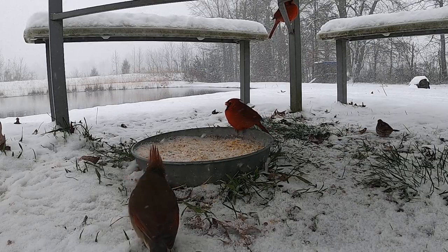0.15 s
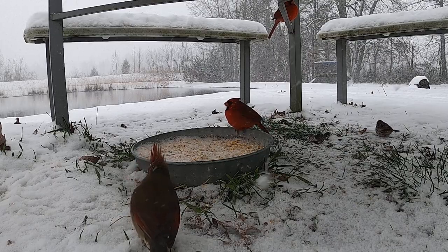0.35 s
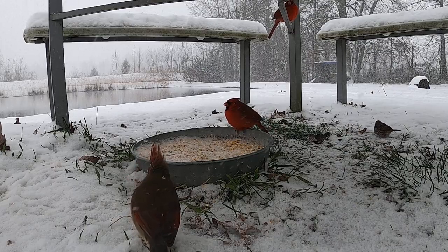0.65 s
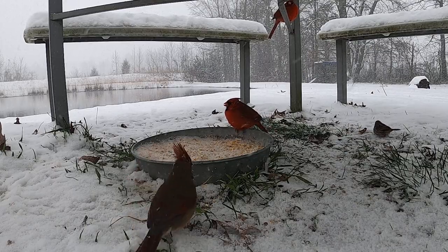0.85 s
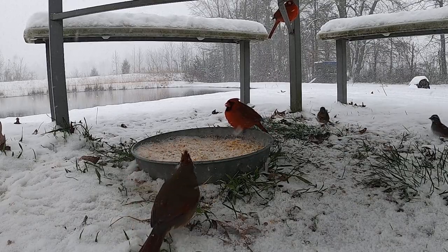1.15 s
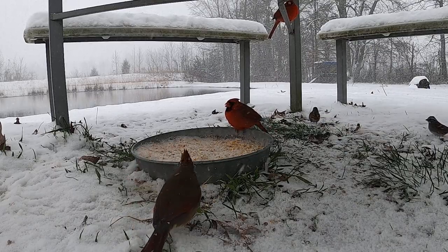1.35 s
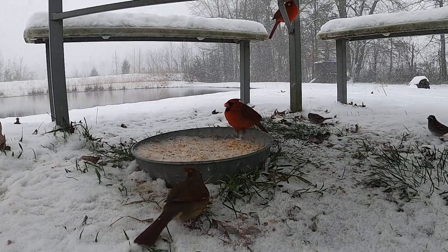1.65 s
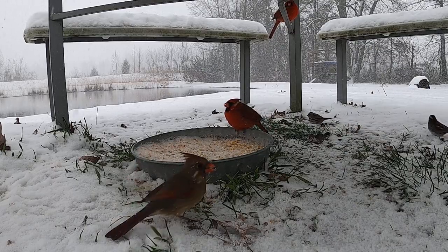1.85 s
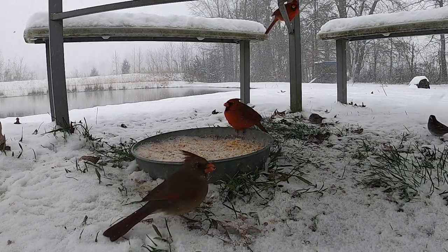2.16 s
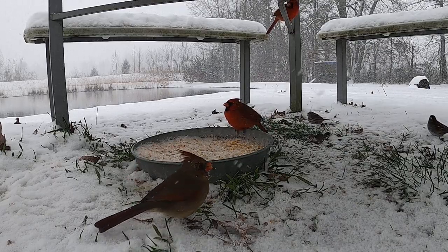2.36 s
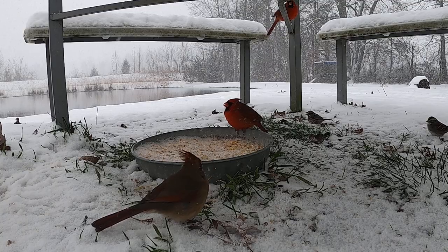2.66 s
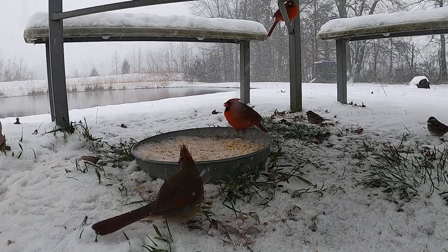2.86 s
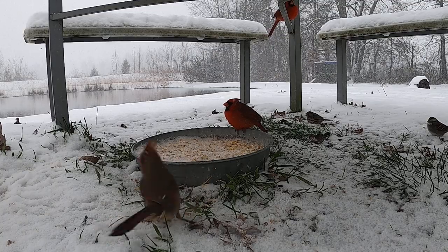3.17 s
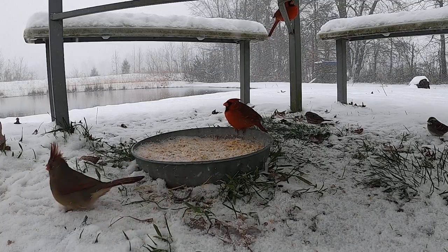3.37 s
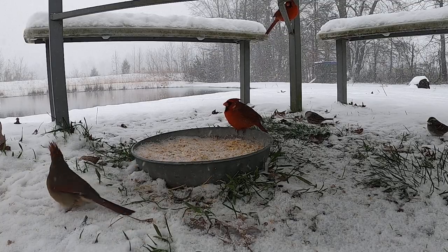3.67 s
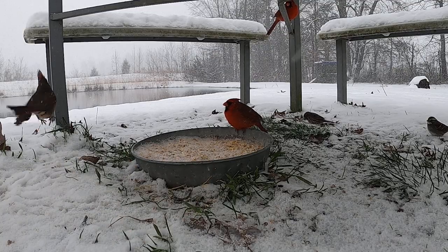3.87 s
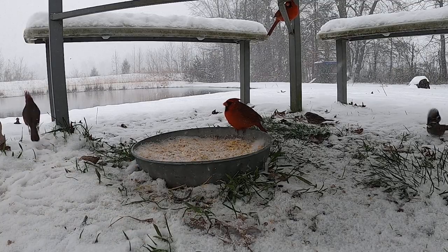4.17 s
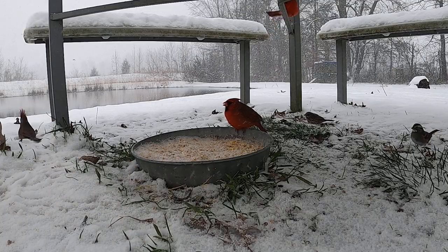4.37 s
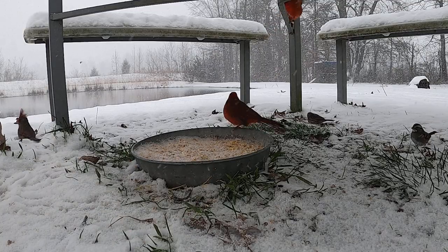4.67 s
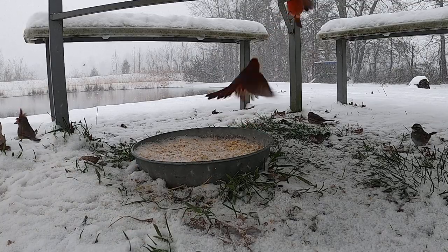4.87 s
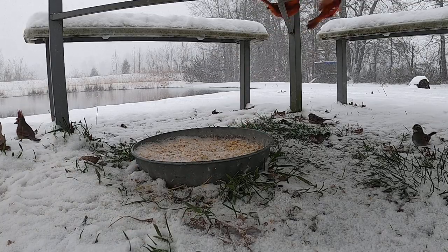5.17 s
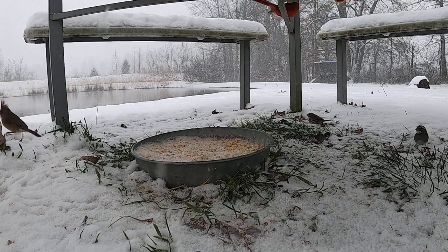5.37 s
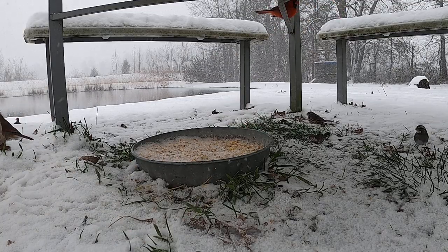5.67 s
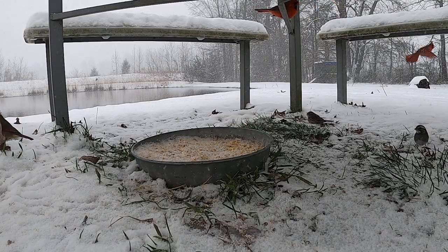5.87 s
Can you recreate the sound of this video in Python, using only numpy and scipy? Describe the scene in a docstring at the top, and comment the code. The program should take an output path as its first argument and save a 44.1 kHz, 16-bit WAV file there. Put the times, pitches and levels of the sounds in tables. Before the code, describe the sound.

A quiet snowy yard is heard close to the ground in stereo, with a steady distant low rumble, soft hiss and breeze. Thin, high bird whistles glide down at 0.15 and 0.7 seconds, lightly echoed by trees. Soft wind bumps crowd the microphone from 0.7 to 2.6 seconds, while small dry taps, snow scuffs, faint squeaks and a little flutter appear, with firmer pecks around 1.6. It thins out until 3.0 to 3.3, when taps and crunches return; a crisp crack lands at 3.8. Scuffing resumes from 4.1, with sharp taps at 4.7 and a strong cluster at 4.8 to 4.9. From 5.0 to 5.4 a bird takes off: quick puffing wingbeats, loudest near 5.25, rasping feathers and claws scraping and knocking on metal with short rings. A tiny clink follows at 5.7, then stray ticks and rumble.

```python
"""Small birds feed at a metal tub on snowy ground: beaks and feet tap in cracks and rattles of tiny fractures that
stir damped metal modes, and scuffs of snow and seed are longer, lumpy showers of the same fractures.
A bird gives two thin gliding whistles among faint squeaks and flutters. Near the end one takes off: its wing beats
are pulses of air with rasping feathers, and its claws knock on metal, which rings as a sum of decaying modes.
Beneath lie a distant rumble, a soft hiss and a breeze, all filtered noise, that buffets two microphone ports."""
import sys
import numpy as np
from scipy import signal
from scipy.fft import rfft, irfft, next_fast_len
from scipy.io import wavfile
from scipy.ndimage import uniform_filter1d

SR = 44100
rng = np.random.default_rng(int(sys.argv[2]) if len(sys.argv) > 2 else 0)


def unload_wav(signal):
    """Save mono or channel-first audio to the path in sys.argv[1] as 16-bit WAV at rate SR, clipped to [-1, 1]."""
    wavfile.write(
        sys.argv[1],
        SR,
        np.round(np.clip(np.atleast_2d(signal).T, -1, 1) * 32767).astype(np.int16),
    )


N = 265393
T = np.arange(N) / SR
SIZE = 16384  # samples in a filter design or a short event

# far rumble: (time [s], level [dB])
RUMBLE_LEVEL = [(0, -52), (.4, -60), (.9, -52.5), (1.5, -61.5), (2.7, -61), (3.4, -58), (5.5, -57),
                (5.8, -54)]
# breeze between gusts, before its left-right offset: (time [s], level [dB])
BREEZE_LEVEL = [(0, -47), (1.1, -52), (2.1, -50.5), (2.8, -67.5), (4.5, -62), (6, -73)]
# gusts striking the ports: (peak time [s], length [s], level [dB], left minus right [dB])
GUSTS = [(0.662, 0.033, -39.5, 8), (0.863, 0.074, -39.5, -4), (1.123, 0.19, -41, 2.5),
         (1.338, 0.054, -46, 24.5), (1.405, 0.071, -37, 0), (1.622, 0.05, -44.5, 7),
         (1.823, 0.092, -40, 7.5), (1.916, 0.051, -47, 24.5), (2.17, 0.065, -37, 12),
         (2.348, 0.14, -45, 4.5), (2.583, 0.069, -47.5, 5), (3.21, 0.09, -47.5, 10),
         (3.416, 0.094, -46.5, 8.5), (3.738, 0.081, -42.5, 11), (4.737, 0.092, -43, 5.5),
         (5.673, 0.059, -50.5, 3)]
# thin calls: (time [s], starting pitch [Hz], settled pitch [Hz], level [dB], rise [s], fade [s])
THIN_CALLS = [(0.153, 8960, 6900, -52.5, 0.026, 0.1), (0.716, 8000, 6790, -51.5, 0.012, 0.073)]
# faint squeaks and far whistles: (time [s], length [s], pitch [Hz], relative level [dB], pitch spread [Hz])
PEEPS = [(0, .19, 4420, -77.5, 40), (1.014, 0.16, 6200, -73, 180), (1.356, 0.039, 2170, -70, 200),
         (1.579, 0.032, 2340, -65.5, 250), (4.798, 0.017, 2260, -54.5, 252)]
# flutters of small wings: (time [s], length [s], level [dB], resonance [Hz], resonance height [dB])
FLUTTERS = [(1.068, 0.18, -59, 1230, 8), (2.519, 0.055, -62, 1600, 9), (2.612, 0.031, -59.5, 990, 10),
            (2.758, 0.046, -62, 1990, 9)]
# wing beats pushing air: (time [s], peak level [dB], width of the push [s], swish relative to push [dB])
WING_BEATS = [(4.983, -39, 0.007, -17), (5.021, -38.5, 0.0013, -3), (5.14, -38, 0.018, -1.5),
              (5.195, -29, 0.00083, -3.5), (5.2486, -24.5, 0.0014, -10), (5.267, -33, 0.0025, -2),
              (5.281, -31.5, 0.0097, -12), (5.299, -30.5, 0.002, -10), (5.349, -30, 0.0017, -9.5),
              (5.407, -34.5, 0.0015, -29)]
# flurries of wings that stir a draught: (time [s], length [s], level [dB])
FLURRIES = [(1.068, 0.15, -44.5), (4.523, 0.21, -52), (4.942, 0.12, -46), (5.163, 0.23, -39.5)]
# claws on metal: (time [s], length [s], level [dB], low tone [dB], top tone [dB], ring [dB], strongest ring [Hz])
KNOCKS = [(4.531, 0.0088, -52, 14, 1, -59, 3600), (4.980, 0.0029, -39.5, 10, -7, -43.5, 2620),
          (5.135, 0.017, -45, 10.5, -26, -49, 630), (5.156, 0.034, -46, 7, 5, -53, 4800),
          (5.174, 0.01, -41.5, -2, -14, -36, 2580), (5.203, 0.032, -46.5, 13.5, -7, -49, 510),
          (5.223, 0.011, -41.5, 16, -10, -52, 1120), (5.258, 0.0042, -36, 9.5, -12, -50, 3500),
          (5.277, 0.12, -53.5, 11.5, -6, -81, 2000), (5.363, 0.0063, -38, 4, 2, -44, 7400),
          (5.369, 0.0059, -49.5, 7, 5, -45.5, 3600), (5.696, 0.012, -57.5, -4, -3, -52.5, 3700),
          (5.708, 0.044, -65, 16, -5, -58.5, 1360)]
# modes of the metal, undamped: (frequency [Hz], level [dB], 60 dB decay time [s])
METAL_MODES = [(508, 3, 0.8), (804, 3.5, 0.098), (954, 6.5, 0.057), (1180, 2.5, 0.16), (1330, -5.5, 0.31),
               (1705, -4.5, 0.36), (2120, -7, 0.2), (2700, -5, 0.27), (3570, 0, 0.1), (3597, -0.5, 0.12),
               (7940, 5, 0.084), (7420, 8, 0.16)]
# scuffs in snow and seed: (time [s], length [s], level [dB], low tone [dB], top tone [dB])
SCUFFS = [(0.824, 0.11, -64.5, 5, -5.5), (0.937, 0.019, -57, 11, 6), (0.963, 0.0045, -52, 3, -20),
          (1.071, 0.021, -53.5, 10, -3), (1.251, 0.029, -63, 16, 1), (1.311, 0.039, -58.5, 3, -17),
          (1.504, 0.098, -60, -1, -13), (1.607, 0.025, -52, 0.5, -16), (1.64, 0.12, -67, 2, -17),
          (1.787, 0.05, -66, -5, -9), (1.93, 0.045, -62.5, -1, -3), (2.316, 0.014, -59.5, -14, -8),
          (3.012, 0.048, -55, 12.5, -3.5), (3.134, 0.011, -62, 16.5, 4), (3.247, 0.032, -59, 12, 6),
          (3.282, 0.045, -55.5, -3, -19), (3.318, 0.029, -51, -1, -9), (3.428, 0.016, -53, -12, -11),
          (3.811, 0.025, -53, 12.5, -9), (4.114, 0.035, -53.5, 19, 3.5), (4.215, 0.032, -64, 19, 6),
          (4.382, 0.096, -59.5, 6.5, -6), (4.517, 0.093, -60.5, 18, -8), (4.609, 0.033, -60, 24, -3),
          (4.715, 0.26, -64, 18, -4), (4.962, 0.021, -45, 18, -7)]
# taps of beaks and feet: (time [s], contact length [s], strength [dB], resonance [Hz], resonance height [dB],
# low tone [dB], top tone [dB])
PECKS = [(0.946, .004, -25.5, 4660, 10, -7, 3), (1.07, 0.0063, -33, 2620, 12, -2, 0),
         (1.322, .006, -33.5, 2800, 18.5, -9, 1), (1.57, .003, -32, 1410, 25, -4, -8),
         (1.607, 0.0058, -21, 3800, 11, 5, -13), (1.629, 0.0021, -21.5, 3930, 12, 3, -9),
         (1.658, .003, -30, 4700, 5, -2, -12), (2.1635, 0.00093, -32, 1790, 14.5, -4, -16),
         (2.374, 0.0073, -26, 3660, 7, 1, -10), (2.871, .004, -35.5, 2240, 16, 18, -20),
         (2.955, 0.009, -23.5, 5600, 7.5, 9.5, -11), (3.002, 0.0018, -30, 1480, 14, 10, -17),
         (3.0054, .003, -20.5, 3000, 7, 2, -25), (3.306, .004, -18.5, 4800, 8, 13.5, -8),
         (3.824, 0.0032, -27.5, 745, 29.5, 2, -22), (3.8256, 0.0032, -15, 4280, 13.5, 15.5, -22),
         (4.368, 0.0025, -33.5, 5400, 11, 14, 0), (4.615, 0.0044, -28, 1620, 13, 11, 3),
         (4.6772, 0.0011, -8, 5200, 7.5, 18, 6.5), (4.818, 0.0035, -15.5, 1290, 5, 12.5, -23),
         (4.848, 0.0024, -16.5, 2280, 10, 15, -33), (4.859, 0.001, -5.5, 1370, 17.5, -5, -14.5),
         (4.8618, 0.0015, -14.5, 2670, 2, -5, -10), (4.879, 0.0014, -18.5, 2500, 2, 13, -30)]
# spectrum of the far rumble: (frequency [Hz], relative density [dB])
RUMBLE_SPECTRUM = [(10, -4.5), (40, 7), (90, -2.5), (160, -4.5), (230, -10), (300, -24), (450, -30.5),
                   (800, -58.5), (2000, -62)]
# spectrum of the soft hiss: (frequency [Hz], relative density [dB])
HISS_SPECTRUM = [(250, 7), (450, 2), (600, -3.5), (850, -4), (1200, 0.5), (1800, -1.5), (2800, -4),
                 (4500, -1), (7300, 0.5), (9000, -13), (12500, -24), (15500, -30.5)]
# spectrum of the large swirls of wind: (frequency [Hz], relative density [dB])
BUFFET_SPECTRUM = [(8, -7.5), (25, 4), (48, -0.5), (85, -6.5), (140, -18.5), (250, -49), (2000, -115)]
# spectrum of the small eddies of wind: (frequency [Hz], relative density [dB])
EDDY_SPECTRUM = [(30, -16), (70, -1), (130, 5), (220, -16.5), (500, -61.5), (2500, -110)]
# spectrum of the draught from wings: (frequency [Hz], relative density [dB])
DRAUGHT_SPECTRUM = [(10, -33), (45, 12), (110, 6), (180, -1), (300, -12.5), (550, -19), (1000, -68),
                    (3000, -44), (12000, -67)]
# spectrum of rasping feathers: (frequency [Hz], relative density [dB])
SWISH_SPECTRUM = [(40, 10), (150, 3.5), (300, 6), (600, -8), (950, -9), (2000, -10), (6000, -24),
                  (15000, -41)]
# spectrum of claws scraping and wings rustling: (frequency [Hz], relative density [dB])
SCRAPE_SPECTRUM = [(100, 11), (500, -8.5), (850, -4.5), (1300, 1.5), (2400, 3.5), (3500, 8), (4300, 3),
                   (7500, 5), (9000, -6), (12500, -9), (15500, -31)]
# spectrum of crushed snow and seed: (frequency [Hz], relative density [dB])
CRUNCH_SPECTRUM = [(100, -9), (500, -23.5), (850, -18), (1250, -2.5), (2200, -2.5), (3500, 4), (5500, 8),
                   (7500, 6.5), (9000, -4.5), (12500, -14), (15500, -20)]
# spectrum of a sharp tap: (frequency [Hz], relative density [dB])
SNAP_SPECTRUM = [(100, -22), (500, -21.5), (800, -18.5), (1200, -5), (2200, 3), (3500, 4.5), (5500, 9.5),
                 (7500, 10.5), (9000, -0.5), (12500, -3.5), (15500, -30)]
# tone balance of the port pair: (frequency [Hz], left minus right [dB])
PORT_BALANCE = [(100, 0.16), (500, -2), (2500, 1.9), (4500, 1.8), (6500, 0.2), (8200, -6), (12000, -8),
                (15000, -9)]
# likeness of the ports for most sounds: (frequency [Hz], likeness [0-1])
NEAR_SAME = [(100, 0.99), (500, 0.95), (2500, 0.83), (5000, 1), (7000, 0.17), (12000, 0.046)]
# likeness of the ports for the hiss: (frequency [Hz], likeness [0-1])
FAR_SAME = [(100, 0.26), (1500, 0.18), (5000, .35), (9000, 0.16), (15000, 0.041)]

EDGE_HZ = 15700  # upper band limit
PORT_LAG_MS = 0.052  # the left port hears later
BREEZE_LEFT_DB = 8  # the breeze favours the left port
CALL_S, SLIDE_S = 0.084, 0.024  # time until a call turns up, time constant of its settling pitch
LIFT_HZ_PER_S, LIFT_S = 12000, 0.04  # speed and length of the upturn
QUAVER = 0.005  # rms share by which the pitch of a call wavers
FLUTTER_PER_S, FLUTTER_DB = 32, 3.5  # nominal rate and depth of the beats in a flutter
RASP_S = 0.005  # time constant of the rasp on either side of a downstroke
DRAUGHT_RISE_S, DRAUGHT_FALL_S = 0.034, 0.027
MODE_SPLIT = 0.01  # each knocked mode is a close pair that beats
CLUMP_DB, CLUMP_S = 2.5, 0.004  # rms depth and duration of the lumps in a contact
SCUFF_RISE = 0.25  # share of its length over which a scuff presses in


def amp(db):
    """Definition of the decibel: level to amplitude gain."""
    return 10 ** (np.asarray(db) / 20)


def evened(x):
    """Normalisation to unit rms."""
    return x / np.sqrt(np.mean(x ** 2) + 1e-30)


def read(points, hz):
    """Linear interpolation on a logarithmic frequency axis."""
    f, value = np.transpose(points)
    return np.interp(np.log(hz + 1), np.log(f), value)


def level(curve):
    """Interpolation of a decibel curve to a gain for every sample."""
    return amp(np.interp(T, *np.transpose(curve)))


def add(mix, s, sound):
    """Superposition: lays a sound into the mix at time s."""
    part = mix[:, max(round(s * SR), 0):][:, :sound.shape[-1]]
    part += sound[..., :part.shape[1]]


def colour(x, spectrum, low_db=0, top_db=0, peak_hz=1000, peak_db=0):
    """Minimum-phase filtering at unit energy: a spectrum, two tone shelves and one broad resonance."""
    hz = np.fft.rfftfreq(SIZE, 1 / SR)
    db = read(spectrum, hz)
    db += low_db / (1 + (hz / 2200) ** 4)
    db += top_db * (1 - 1 / (1 + (hz / 7500) ** 4))
    db += peak_db / (1 + ((hz / peak_hz - 1) / 0.3) ** 2)
    # folding the cepstrum makes the response causal
    cepstrum = irfft(np.log(amp(db)))[:SIZE // 2]
    cepstrum[0] = 0
    response = irfft(np.exp(rfft(2 * cepstrum, SIZE)))[:SIZE // 4]
    response = response / np.linalg.norm(response)
    return signal.fftconvolve(x, response[None], axes=1)[:, :x.shape[1]]


def ports(pair, same, shade=1):
    """Partial coherence: blends two signals into a left and right partly alike; the left is delayed."""
    size = next_fast_len(pair.shape[1] + 256)
    hz = np.fft.rfftfreq(size, 1 / SR)
    a, b = rfft(pair, size)
    angle = np.arccos(np.clip(read(same, hz), 0, 1)) / 2
    side = amp(shade * read(PORT_BALANCE, hz) / 2)
    lag = np.exp(-2j * np.pi * hz * PORT_LAG_MS / 1000)
    left = (a * np.cos(angle) + b * np.sin(angle)) * side * lag
    right = (a * np.cos(angle) - b * np.sin(angle)) / side
    return irfft(np.array([left, right]), size)[:, :pair.shape[1]]


def stroke(length, fall, rise=0.0011):
    """Contact envelope: linear rise, hold until length, then exponential decay."""
    t = np.arange(SIZE) / SR
    return np.minimum(t / rise, 1) * np.exp(-np.maximum(t - length, 0) / fall)


def clumps():
    """Stick and slip: snow and claws give way in fits and starts, a lumpy random gain."""
    return amp(CLUMP_DB * evened(uniform_filter1d(rng.standard_normal(SIZE), int(CLUMP_S * SR))))


def grains(envelope, per_s, spread_db, count=8):
    """Random impulse shower: tiny fractures of uneven size in separate pitch bands, at unit energy."""
    shape = (count, 2, len(envelope))
    size = amp(spread_db * np.minimum(rng.exponential(1, shape[::2]), 3))
    size *= rng.random(shape[::2]) < per_s / SR
    # 0.47 is a floor of noise between the fractures
    trains = envelope * (size[:, None] + 0.47) * rng.standard_normal(shape)
    hz = np.fft.rfftfreq(len(envelope), 1 / SR)
    band = np.interp(np.log1p(hz), np.log([800, 12000]), [0, count - 1])
    weight = np.cos(np.pi / 2 * np.clip(band - np.arange(count)[:, None], -1, 1))
    x = irfft((rfft(trains) * weight[:, None]).sum(0))[:, :len(envelope) * 3 // 4]
    return x / np.linalg.norm(x, axis=1, keepdims=True)


def steady(spectrum, smooth):
    """Running rms normalisation: two unrelated noises with their own slow swells evened out."""
    x = colour(rng.standard_normal((2, N + SIZE)), spectrum)[:, SIZE:]
    return x / np.sqrt(uniform_filter1d(x ** 2, int(smooth * SR) + 1, axis=1) + 1e-12)


def echoes(x, t60):
    """Diffuse reverberation: a thin tail of exponentially decaying noise, different at each port."""
    t = np.arange(SR // 2) / SR
    tail = rng.standard_normal((2, len(t))) * amp(-60 * t / t60) * (t > 0.006)
    return signal.fftconvolve(x, tail / np.linalg.norm(tail[0]), axes=1)[:, :N]


def background(hiss_db=-68):
    """Stationary noise: an even hiss, and a far rumble of slowly changing level."""
    hiss = ports(colour(rng.standard_normal((2, N)), HISS_SPECTRUM), FAR_SAME, shade=0.95)
    rumble = ports(steady(RUMBLE_SPECTRUM, smooth=0.17), NEAR_SAME)
    return amp(hiss_db) * hiss + level(RUMBLE_LEVEL) * rumble


def breeze(eddy_db=-41, strong_db=-30, eddy_growth=0.85):
    """Turbulent pressure: gusts buffet each port on its own; small eddies grow faster than large ones."""
    side = np.array([[0.5], [-0.5]])
    power = (level(BREEZE_LEVEL) * amp(side * BREEZE_LEFT_DB)) ** 2
    for s, length, db, left_db in GUSTS:
        power = power + amp(db + side * left_db) ** 2 * np.exp(-(2 * (T - s) / length) ** 2)
    force = np.sqrt(power)
    eddy_force = (force / amp(strong_db)) ** (1 + eddy_growth)
    small = amp(eddy_db) * steady(EDDY_SPECTRUM, smooth=0.032) * eddy_force
    return steady(BUFFET_SPECTRUM, smooth=0.071) * force + small


def peeps():
    """Frequency modulation: short narrow squeaks with a randomly unsteady pitch."""
    out = np.zeros((2, N))
    for s, length, hz, db, width in PEEPS:
        count = int(length * SR)
        pitch = hz + width / 2 * evened(uniform_filter1d(rng.standard_normal(SIZE), 40))[:count]
        swell = signal.windows.tukey(count, min(0.02 / length, 1))
        add(out[:1], s, 2 * amp(db) * np.sin(2 * np.pi * np.cumsum(pitch) / SR) * swell)
    return ports(out, NEAR_SAME)


def calls(echo_db=-1, echo_t60=0.26):
    """Gliding tones: thin whistles drop fast, settle and turn up as they fade, smeared by echoes from trees."""
    out, t = np.zeros((2, N)), np.arange(SIZE) / SR
    for s, start_hz, end_hz, db, rise, fade in THIN_CALLS:
        quaver = 1 + QUAVER * evened(uniform_filter1d(rng.standard_normal(SIZE), size=45))
        pitch = end_hz + (start_hz - end_hz) * np.exp(-t / SLIDE_S)
        pitch += LIFT_HZ_PER_S * np.maximum(t - CALL_S, 0)
        voice = stroke(rise, fade, rise) * stroke(CALL_S + LIFT_S, fall=0.006)
        add(out[:1], s, amp(db) * voice * np.sin(2 * np.pi * np.cumsum(pitch * quaver) / SR))
    return ports(out, NEAR_SAME) + amp(echo_db) * echoes(out[:1], echo_t60)


def flutters(low_db=8, top_db=-2):
    """Amplitude modulation: small wings and feet rustle in quick uneven beats around one resonance."""
    out = np.zeros((2, N))
    for s, length, db, hz, peak_db in FLUTTERS:
        turns = np.cumsum(FLUTTER_PER_S * clumps()) / SR
        beats = stroke(length, fall=0.012, rise=0.011) * amp(FLUTTER_DB * np.sin(2 * np.pi * turns))
        whirr = colour(grains(beats, per_s=400, spread_db=5), SCRAPE_SPECTRUM, low_db, top_db, hz, peak_db)
        add(out, s, amp(db) * np.sqrt(length * SR) * whirr)
    return ports(out, NEAR_SAME)


def draught():
    """Envelope of stirred air: it builds with each flurry of wings, holds, and dies away."""
    return sum(amp(db) * np.clip((T - s) / DRAUGHT_RISE_S, 0, 1)
               * np.exp(-np.maximum(T - s - length, 0) / DRAUGHT_FALL_S)
               for s, length, db in FLURRIES)


def wings():
    """Displacement of air: each downstroke is a push and suck with a rasp of feathers, beside a draught."""
    out, lead = np.zeros((2, N)), 0.03  # each beat starts this many seconds before its peak
    t = np.arange(SIZE // 2) / SR - lead
    for s, db, width, swish_db in WING_BEATS:
        rasp = grains(np.exp(-abs(t) / RASP_S), per_s=900, spread_db=5)
        beat = amp(swish_db) * np.sqrt(RASP_S * SR) * colour(rasp, SWISH_SPECTRUM)
        push = (1 - (t / width) ** 2) * np.exp(-(t / width) ** 2 / 2)
        beat[0] += push[:beat.shape[1]]
        add(out, s - lead, amp(db) * beat)
    return ports(out + steady(DRAUGHT_SPECTRUM, smooth=0.066) * draught(), NEAR_SAME)


def knocks(focus_db=14):
    """Modal excitation: scraping claws are heard directly and jolt the metal, mostly in modes near one pitch."""
    out, t = np.zeros((2, N)), np.arange(SR) / SR
    for s, length, db, low_db, top_db, ring_db, spot_hz in KNOCKS:
        scrape = grains(stroke(length, fall=0.017) * clumps(), per_s=800, spread_db=4)
        direct = colour(scrape, SCRAPE_SPECTRUM, low_db, top_db)
        add(out, s, amp(db) * np.sqrt(length * SR) * direct)
        ring = np.zeros(SR)
        for hz, mode_db, t60 in METAL_MODES:
            decay = amp(mode_db - focus_db * abs(np.log2(hz / spot_hz)) - 60 * t / t60)
            tone = np.sin(2 * np.pi * (hz * t + rng.random()))
            twin = np.sin(2 * np.pi * (hz * (1 - MODE_SPLIT) * t + rng.random()))
            ring += decay * (tone + 0.5 * twin)
        chatter = signal.fftconvolve(scrape[0], ring)[:SR]
        add(out[:1], s, amp(ring_db) * (0.85 * ring * np.minimum(t / 0.0017, 1) + 0.5 * chatter))
    return ports(out, NEAR_SAME)


def crumbs(db=-51, per_s=16, start=0.75):
    """Random point events: from the start time on, stray seeds and husks tick here and there."""
    ticks = np.tanh(rng.standard_normal((2, N))) * (rng.random(N) < per_s / SR) * (T > start)
    ticks = ticks + echoes(ticks, t60=0.015)
    return amp(db) * ports(colour(ticks, CRUNCH_SPECTRUM, top_db=-26), NEAR_SAME)


def tub_ring(x, ring_db=-13, damping=7, tilt_db=-5):
    """Damped modes: pecks and steps stir the metal too, but it is choked and dies quickly."""
    t = np.arange(SR // 4) / SR
    ring = sum(amp(db + tilt_db * abs(np.log2(hz / 1200)) - 60 * damping * t / t60)
               * np.sin(2 * np.pi * hz * t)
               for hz, db, t60 in METAL_MODES[1:])
    return amp(ring_db) * signal.fftconvolve(x, ring[None] / np.linalg.norm(ring), axes=1)[:, :N]


def scuffs():
    """Granular fracture: feet and feathers crush snow crystals and shift the seed."""
    out = np.zeros((2, N))
    for s, length, db, low_db, top_db in SCUFFS:
        press = stroke(0.9 * length, fall=0.012, rise=SCUFF_RISE * length)
        crush = grains(press * clumps(), per_s=400, spread_db=5)
        add(out, s, amp(db) * np.sqrt(length * SR) * colour(crush, CRUNCH_SPECTRUM, low_db, top_db))
    return ports(out, NEAR_SAME)


def taps(fall=0.0042, clean_s=0.0018, rise_share=0.51):
    """Impact: a crack and a brief rattle of husk, seed and tub; shorter contacts crack more cleanly."""
    out = np.zeros((2, N))
    # dispersion spreads the crack over a millisecond, treble first
    delay = np.interp(np.fft.rfftfreq(512, 1 / SR), [0, 9000], [0.0013, 0.0002])
    snap = irfft(np.exp(-2j * np.pi * np.cumsum(delay) * SR / 512))[:128]
    for s, length, db, hz, peak_db, low_db, top_db in PECKS:
        crack = np.exp(-length / clean_s)  # share of the energy
        contact = stroke(length, fall, rise_share * length)[:SIZE // 2]
        hit = np.sqrt(1 - crack) * grains(contact, per_s=4500, spread_db=5)
        add(hit[:1], 0, np.sqrt(crack) * snap)
        add(out, s, amp(db) * colour(hit, SNAP_SPECTRUM, low_db, top_db, hz, peak_db))
    return ports(out, NEAR_SAME)


def scene(wet_db=-22, tap_ring_db=-8):
    """Superposition of sources: birds close by, over snow that gives little back."""
    pecks, steps = taps(), scuffs()
    tub = tub_ring(amp(tap_ring_db) * pecks + steps)
    near = pecks + steps + tub + crumbs() + knocks() + flutters() + peeps()
    return near + amp(wet_db) * echoes(near, t60=1.0) + wings() + calls() + breeze() + background()


def record(dry):
    """Band limitation: a linear-phase low-pass filter, as in a recorder."""
    low_pass = signal.firwin(511, EDGE_HZ, window=("kaiser", 9), fs=SR)
    return signal.oaconvolve(dry, low_pass[None], "same")


dry = scene()
out = record(dry)
unload_wav(out)
```